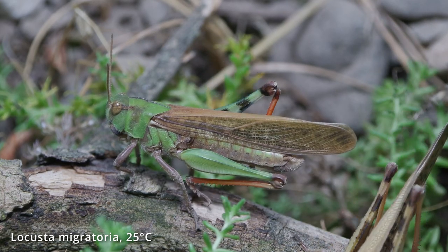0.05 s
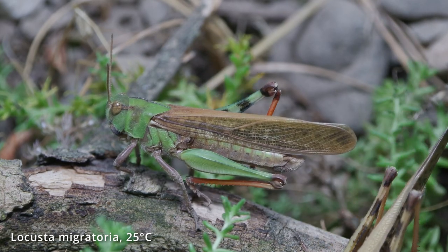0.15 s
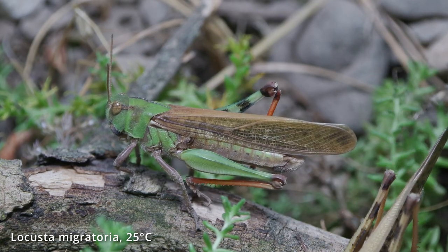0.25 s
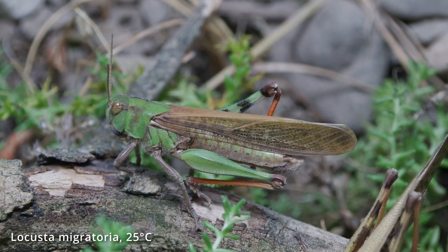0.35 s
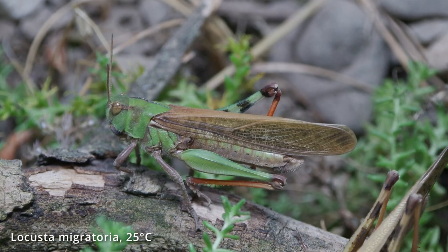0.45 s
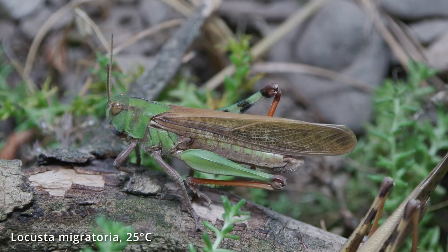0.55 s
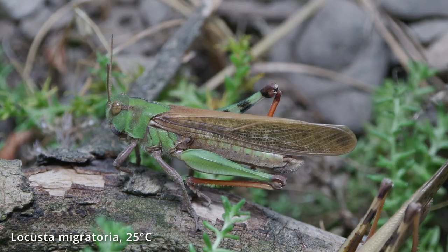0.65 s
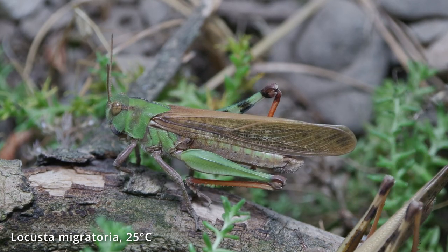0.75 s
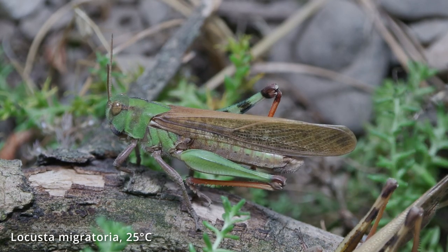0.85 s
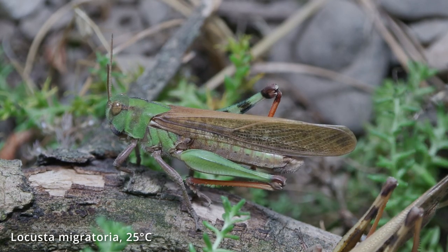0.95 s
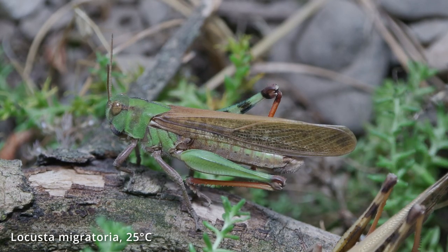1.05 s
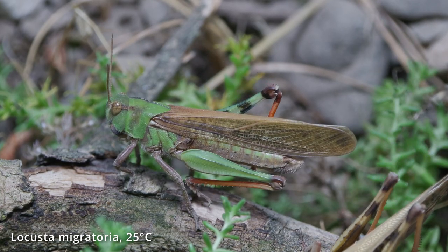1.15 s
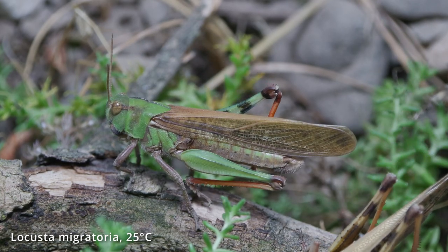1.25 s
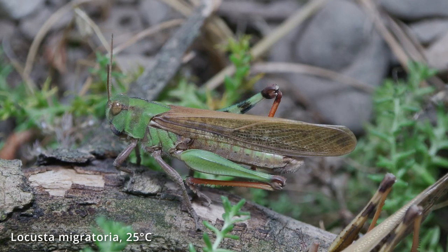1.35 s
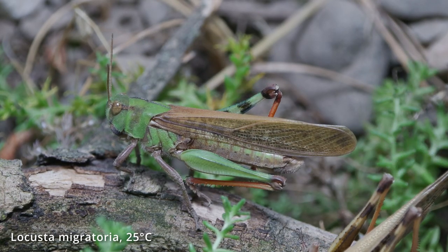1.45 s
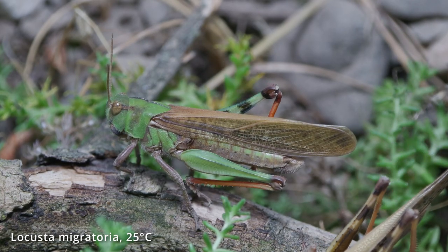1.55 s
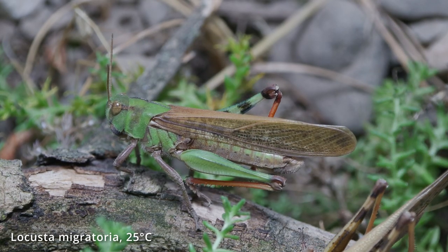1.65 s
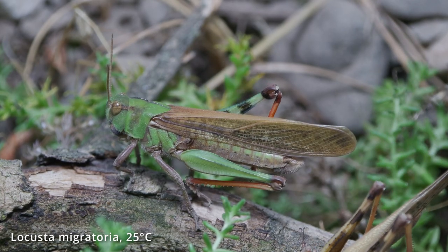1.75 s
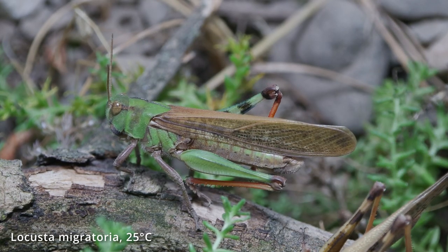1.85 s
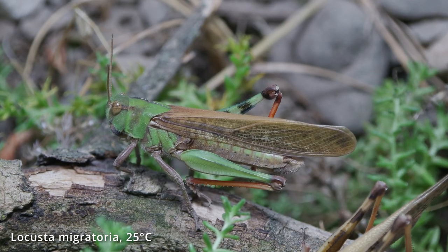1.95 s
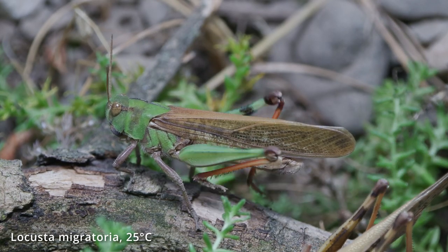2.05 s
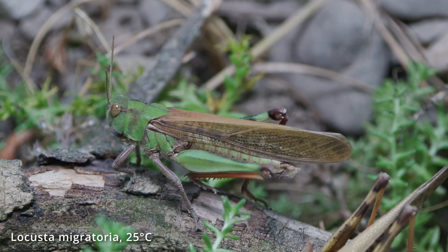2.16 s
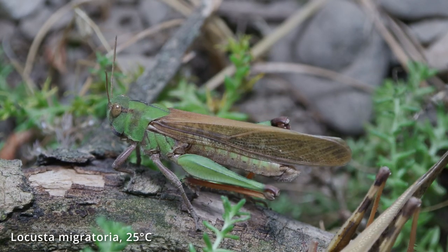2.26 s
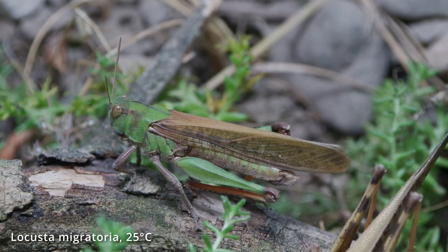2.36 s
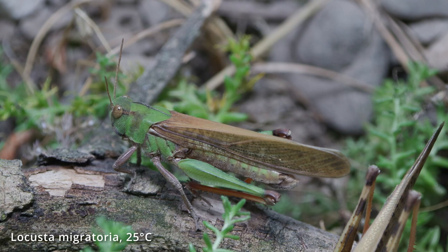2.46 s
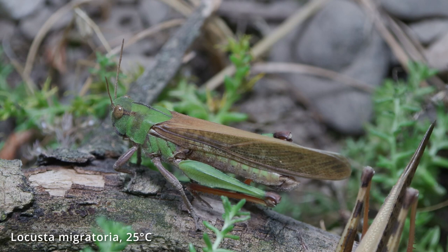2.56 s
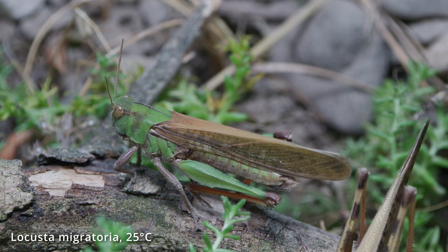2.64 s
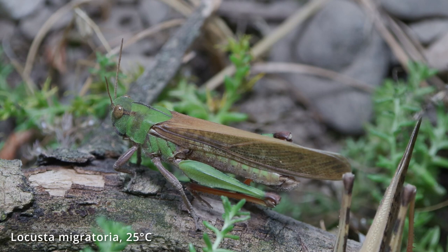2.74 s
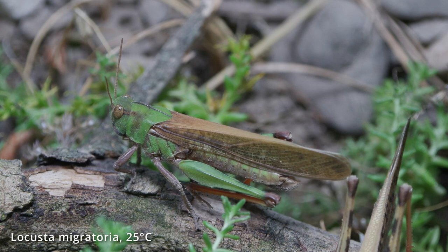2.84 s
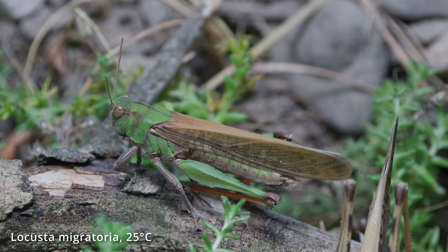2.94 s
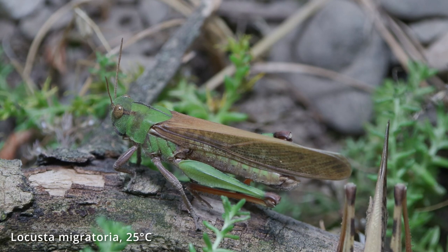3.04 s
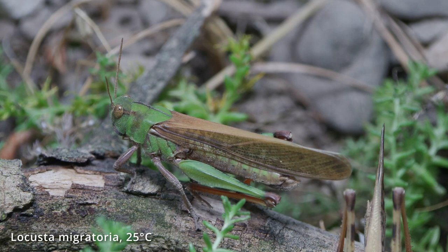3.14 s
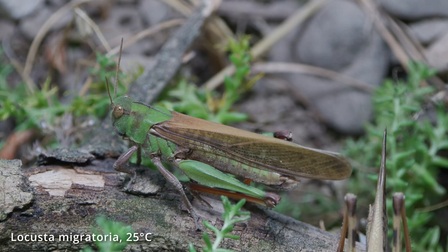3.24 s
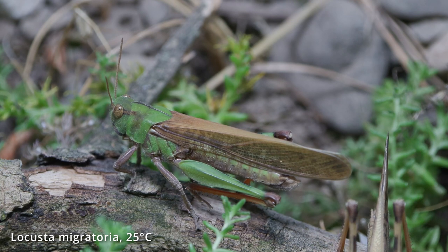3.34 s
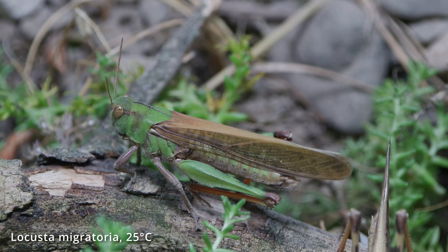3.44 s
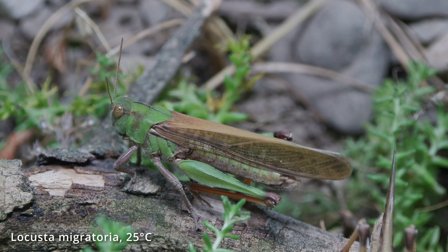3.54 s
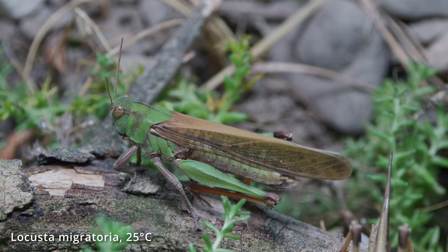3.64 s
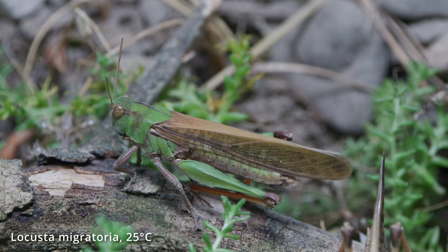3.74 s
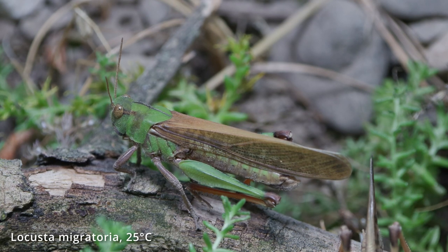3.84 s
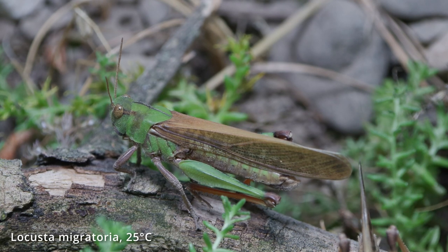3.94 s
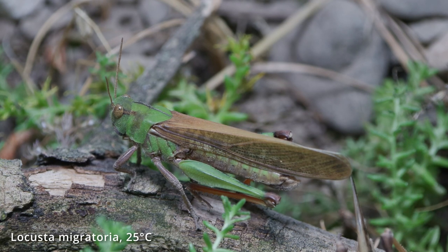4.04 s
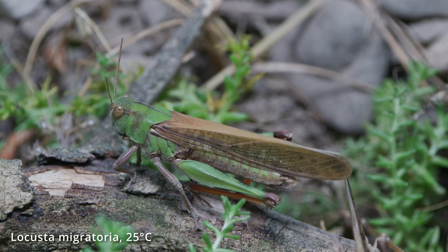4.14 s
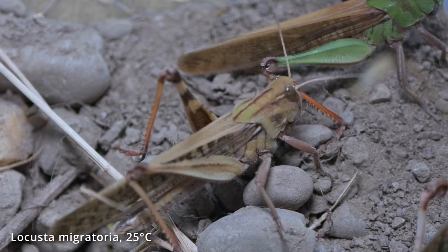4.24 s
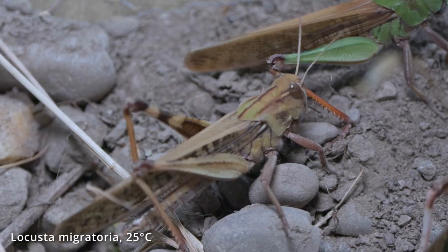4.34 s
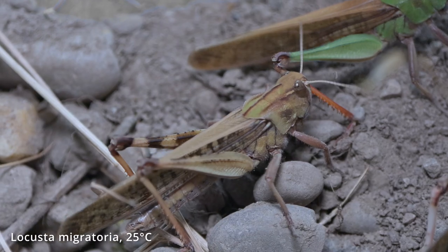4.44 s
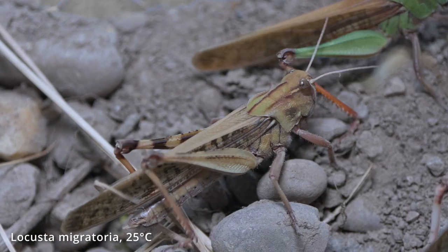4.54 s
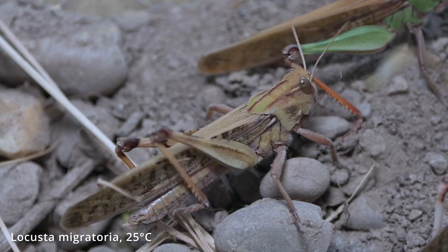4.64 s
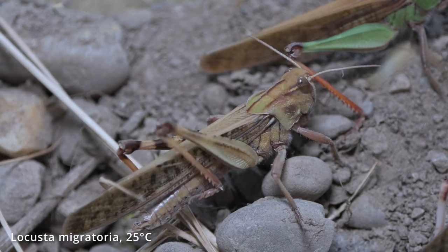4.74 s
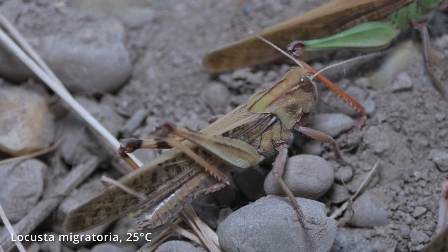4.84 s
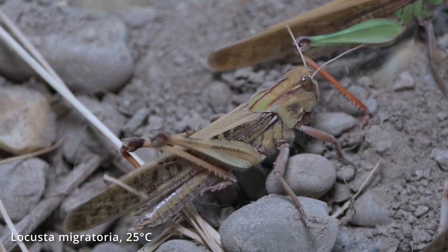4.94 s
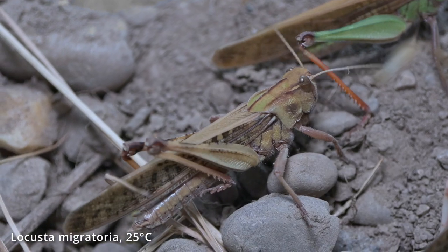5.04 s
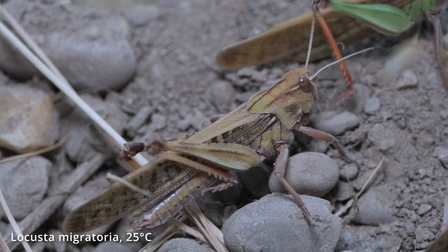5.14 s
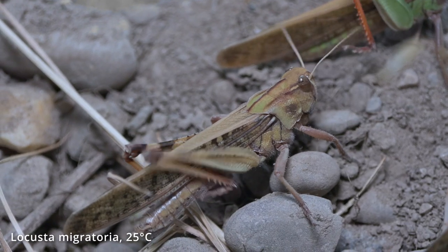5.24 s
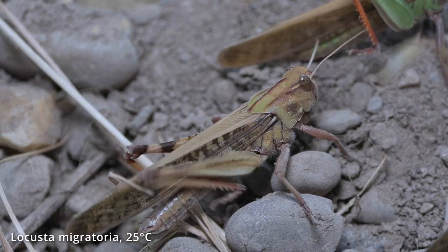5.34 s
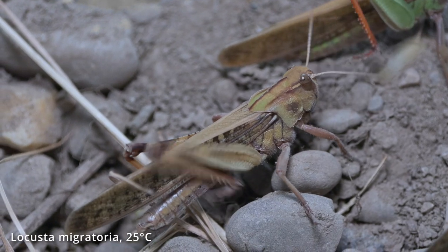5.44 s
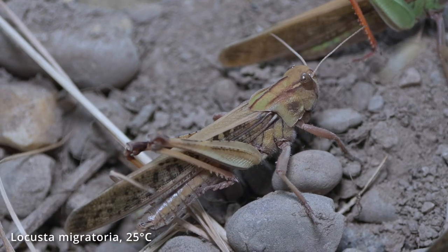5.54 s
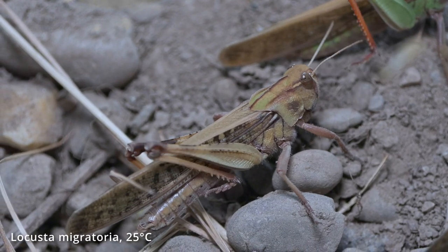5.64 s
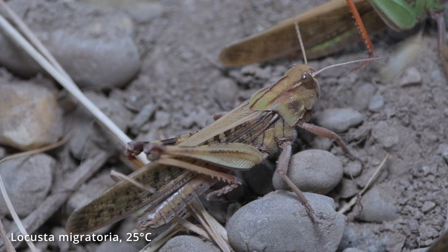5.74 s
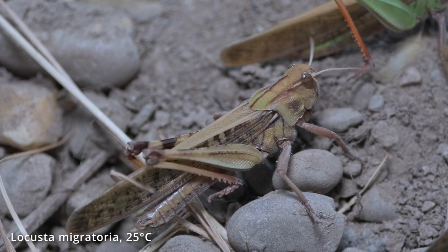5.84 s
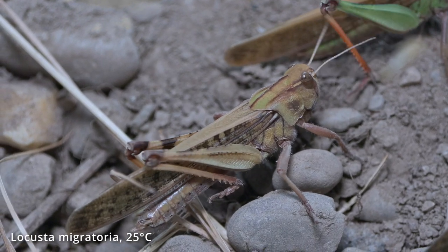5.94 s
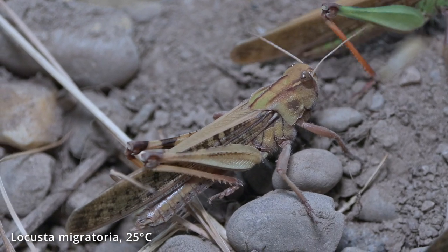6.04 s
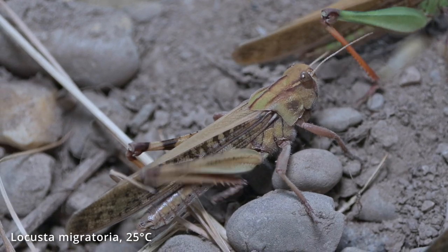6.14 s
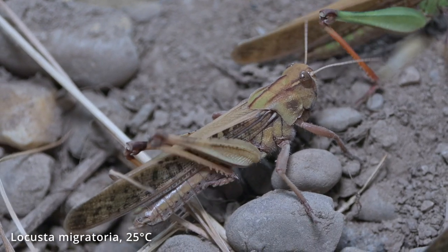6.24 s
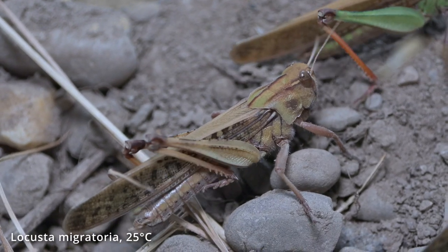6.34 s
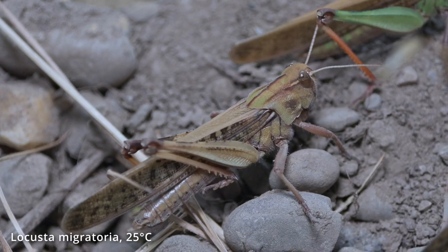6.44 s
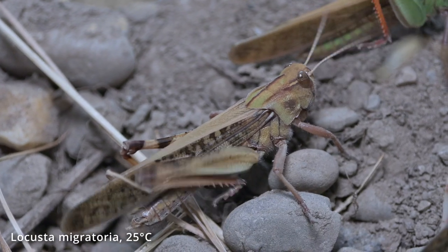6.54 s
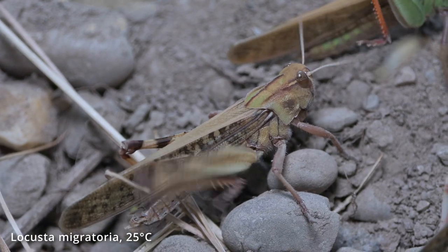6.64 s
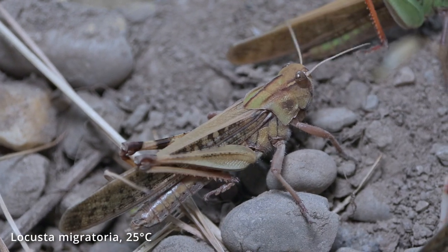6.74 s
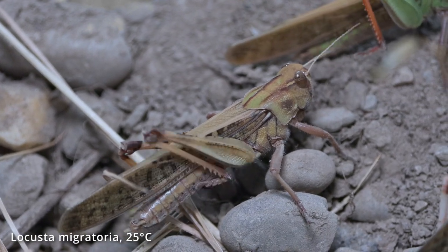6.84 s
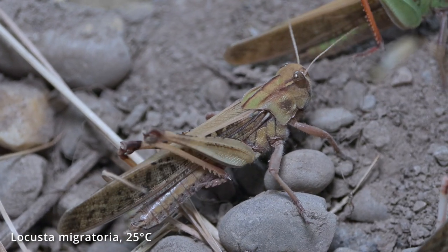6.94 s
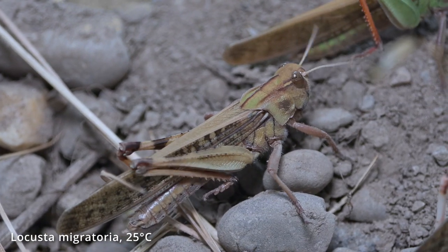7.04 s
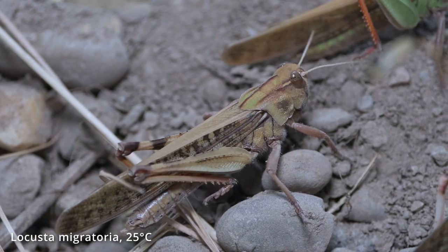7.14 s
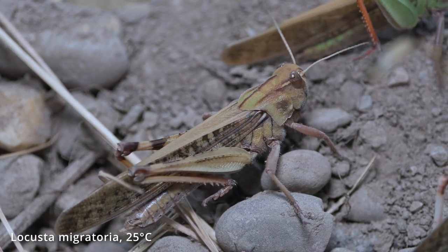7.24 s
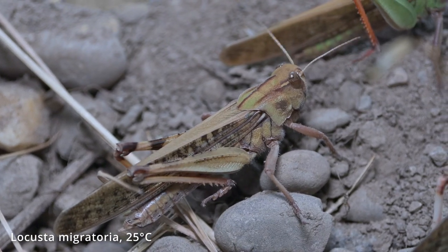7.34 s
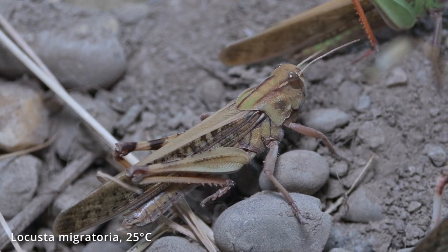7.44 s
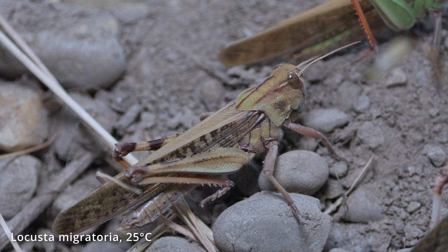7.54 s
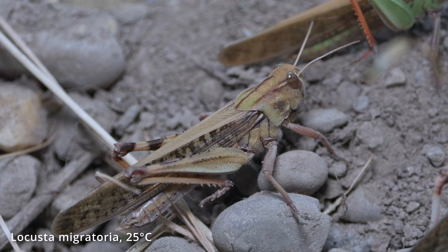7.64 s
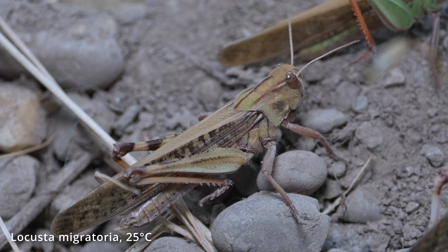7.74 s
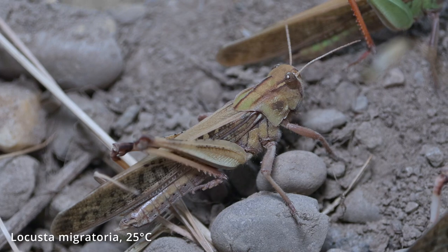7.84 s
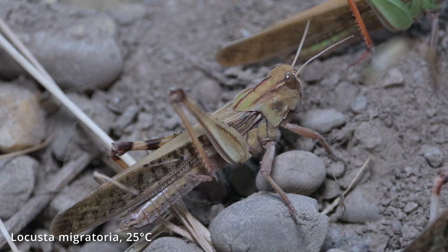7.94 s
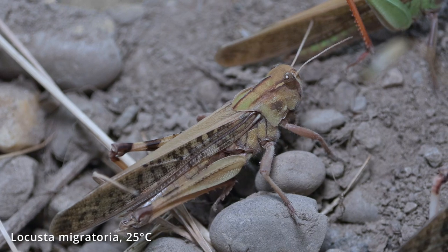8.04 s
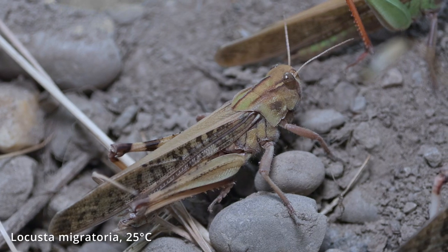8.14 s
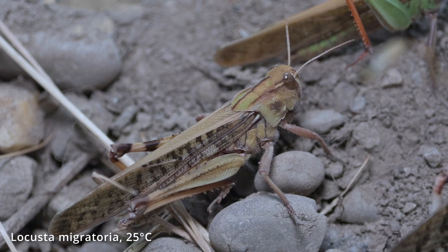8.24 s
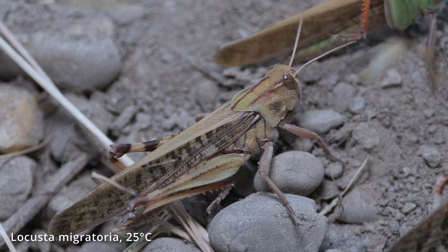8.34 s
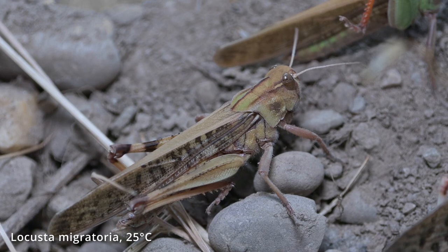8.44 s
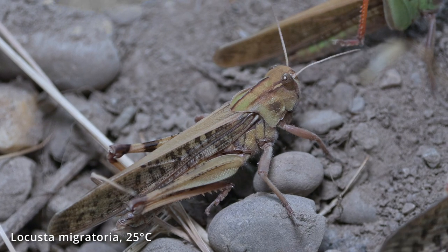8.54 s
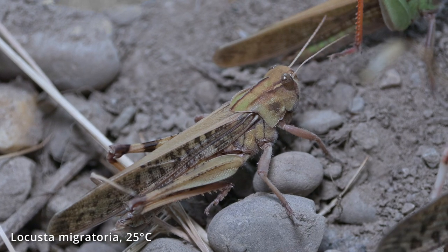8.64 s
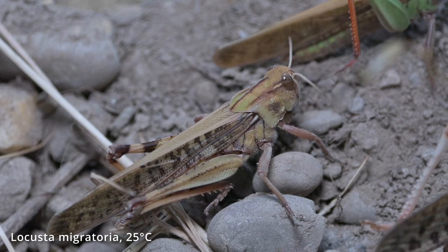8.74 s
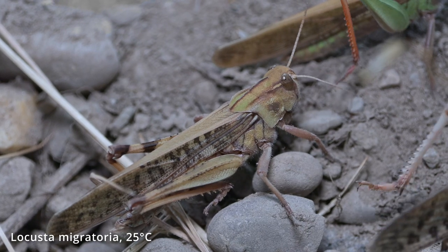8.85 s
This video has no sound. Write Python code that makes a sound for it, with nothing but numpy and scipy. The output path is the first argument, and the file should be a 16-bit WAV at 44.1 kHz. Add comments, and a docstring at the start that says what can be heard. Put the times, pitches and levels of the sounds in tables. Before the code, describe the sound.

A close locust scrapes out two bursts of dry, rapid double rasps on quiet outdoor ground, while distant birds whistle, trill and chatter.

```python
"""Stony ground outdoors: one microphone close to a locust, with distant trees around and a low rumble in the air.
The locust rubs its hind legs on its wings in short double strokes: bands of scraping noise follow each stroke,
swept tones carry the tooth rate. Birds whistle, chatter, warble and trill as gliding sines, echoed by the trees;
bands of noise make far song and hiss. Halfway the listening place moves to a quieter spot."""
import sys
import numpy as np
from scipy import signal
from scipy.fft import rfft, irfft, next_fast_len
from scipy.io import wavfile
from scipy.ndimage import uniform_filter1d, map_coordinates

SR = 44100
rng = np.random.default_rng(int(sys.argv[2]) if len(sys.argv) > 2 else 0)


def store_pcm(level_fs):
    """Save levels as 16-bit WAV."""
    pcm = np.round(np.clip(level_fs, -1, 1) * 32767).astype(np.int16)
    wavfile.write(sys.argv[1], SR, np.atleast_2d(pcm).T)


def gain_from_decibels(decibels):
    """Convert decibel values to linear amplitude factors."""
    exponent = np.asarray(decibels, float) / 20
    return 10 ** exponent


N = 392032


def unit(x):
    """Scaled to rms 1."""
    return x / np.sqrt(np.mean(x ** 2) + 1e-20)


def along(points, hz):
    """Interpolates (Hz, value) points on a log frequency axis."""
    point_hz, values = np.transpose(points)
    return np.interp(np.log(hz + 1), np.log(point_hz + 1), values)


def filtered(x, response):
    """x with its spectrum multiplied by a response of frequency."""
    size = next_fast_len(N + 8192)
    return irfft(rfft(x, size) * response(np.fft.rfftfreq(size, 1 / SR)), size)[..., :N]


def band(lo_hz, hi_hz, order=8):
    """A band-pass gain, with steeper sides at a higher order."""
    return lambda hz: ((1 + (lo_hz / (hz + 1)) ** order) * (1 + (hz / hi_hz) ** order)) ** -.5


def noise(response):
    """Coloured noise of rms 1."""
    return unit(filtered(rng.standard_normal(N), response))


def shaped_noise(points):
    """Noise of rms 1 coloured by (Hz, dB) points."""
    return noise(lambda hz: gain_from_decibels(along(points, hz)))


def wobble(rate):
    """A smooth random curve with rate knots a second."""
    knots = rng.standard_normal(int(N * rate / SR) + 4)
    return map_coordinates(knots, [np.arange(N) * rate / SR])


def add(track, s, piece):
    """Mixes a piece into the track, starting at s seconds."""
    part = track[max(round(s * SR), 0):][:len(piece)]
    part += piece[:len(part)]


def tone(hz, gain):
    """A sine on a pitch path, gain as rms."""
    return np.sqrt(2) * gain * np.sin(2 * np.pi * (np.cumsum(hz) / SR + rng.random()))


def arc(length, start_hz, mid_hz, end_hz):
    """A parabolic pitch path and a soft-edged window."""
    u = np.linspace(0, 1, round(length * SR))
    path = start_hz * (1 - u) * (1 - 2 * u) + 4 * mid_hz * u * (1 - u) + end_hz * u * (2 * u - 1)
    return path, np.sin(np.pi * u) ** 0.28


# Echo decay among the trees. Each row: frequency in Hz, time to fade by 60 dB in seconds.
TREE_DECAY = [(1500, 0.4), (3000, 0.6), (6000, 0.36), (12000, 0.086)]


def trees(x):
    """Echoes from trees and ground: a noise tail in which each frequency dies at its own speed."""
    hz, t, z = signal.stft(rng.standard_normal(SR), SR, nperseg=256)
    decay = gain_from_decibels(-60 * t / along(TREE_DECAY, hz)[:, None])
    build_up = 1 - np.exp(-t / 0.023)
    tail = signal.istft(z * decay * build_up, SR, nperseg=256)[1]
    delayed = np.pad(x, (700, 0))  # samples before the first echo
    return signal.fftconvolve(delayed, tail / np.linalg.norm(tail))[:N]


def far_calls(count=500):
    """Many faint birds at random moments, pitches and slopes, of rms 1 together."""
    out = np.zeros(N)
    for when, pitch, slope, size in rng.random((count, 4)):
        start_hz = 2500 + 2300 * pitch
        mid_hz, end_hz = start_hz * (1.03 - .17 * slope), start_hz * (1.06 - .32 * slope)
        hz, window = arc(0.018 + 0.042 * size, start_hz, mid_hz, end_hz)
        add(out, when * N / SR, tone(hz, window * gain_from_decibels(-7 * pitch)))  # higher calls are fainter
    return unit(out * (1 + wobble(120)))


def chorus_streaks():
    """Noise of rms 1 in narrow streaks of frequency that come and go, like blurred song."""
    z = signal.stft(rng.standard_normal(N), nperseg=512)[2]
    field = uniform_filter1d(rng.standard_normal(z.shape), size=2, axis=0)  # across frequency
    field = uniform_filter1d(field, size=12, axis=1)  # along time
    streaks = signal.istft(z * gain_from_decibels(4.5 * unit(field)), nperseg=512)[1][:N]
    return unit(filtered(streaks, band(2100, 4700, order=14)))


# The air over time. Each row: moment in seconds, rumble level in dB, reference level of the far chorus in dB.
AIR_LEVELS = [(0, -55.5, -71.5), (.8, -53.5, -77), (1.5, -56.5, -69.5), (2.2, -53.5, -65), (3.1, -55, -72),
              (3.5, -53.5, -77), (4.2, -54, -75), (4.35, -60.5, -77), (5.301, -59, -63.5),
              (6.2, -59.5, -63), (6.6, -61.5, -85.5), (7.6, -58.5, -76.5), (8.3, -55, -79),
              (8.89, -54.5, -76)]
# Colour of the low rumble. Each row: frequency in Hz, relative gain in dB.
RUMBLE_COLOUR = [(12, -40), (20, -11), (43, 2.5), (59, 2.5), (111, -5), (200, -22), (260, -46.5),
                 (440, -120)]
# Hiss of the first, green spot. Each row: frequency in Hz, relative gain in dB.
GREEN_COLOUR = [(90, -16.5), (152, 0), (330, -12.5), (450, -10.5), (580, -13.5), (1100, -18), (1950, -25.5),
                (3300, -23.5), (6500, -39), (15900, -41)]
# Hiss of the second, stony spot. Each row: frequency in Hz, relative gain in dB.
STONY_COLOUR = [(90, -27), (152, 0.5), (320, -11), (2050, -19), (4600, -24.5), (6400, -33.5), (15900, -36)]
GREEN_DB, STONY_DB, MOVE_S = -61.5, -67, 4.27  # hiss levels, and the moment of the move


def background():
    """Low rumble, a chorus of far birds both streaky and echoed, and the hiss of either spot."""
    s, *levels = np.transpose(AIR_LEVELS)
    t = np.arange(N) / SR
    rumble_db, chorus_db = [np.interp(t, s, level) for level in levels]
    rumble = gain_from_decibels(rumble_db) * shaped_noise(RUMBLE_COLOUR)
    calls = far_calls()
    chorus = gain_from_decibels(chorus_db - 4.5) * chorus_streaks() + gain_from_decibels(chorus_db - 1.0) * unit(calls + trees(calls))
    moved = np.clip((t - MOVE_S) / 0.023, 0, 1)
    green_hiss = gain_from_decibels(GREEN_DB) * shaped_noise(GREEN_COLOUR)
    stony_hiss = gain_from_decibels(STONY_DB) * shaped_noise(STONY_COLOUR)
    return rumble + chorus + (1 - moved) * green_hiss + moved * stony_hiss


# A buzzy call, a rustle, three blurred strands of far song and a broad wash (the last but one).
# Each row: start in seconds, length in seconds, low edge in Hz, high edge in Hz, level in dB before the flutter.
HISS_BANDS = [(1.845, 0.41, 6700, 7740, -74.5), (3.23, 0.26, 4500, 9000, -82), (2.05, 1.5, 2750, 3020, -71),
              (2.3, 1.35, 4300, 4800, -75.5), (2.15, 1.69, 3100, 7100, -77), (.3, 1.2, 3150, 3750, -75)]


def hisses():
    """Soft, steep-sided bands of noise that swell, flutter and fade."""
    out = np.zeros(N)
    for s, length, lo_hz, hi_hz, db in HISS_BANDS:
        swell = signal.windows.tukey(round(length * SR), .7)
        level = gain_from_decibels(db + 2.2 * wobble(40)[:len(swell)])
        add(out, s, level * swell * noise(band(lo_hz, hi_hz, order=80))[:len(swell)])
    return out


# A far trill of falling chips. Each row: moment in seconds, middle pitch in Hz, level in dB.
TRILL_PATH = [(1.333, 5740, -79), (1.6, 5820, -75), (1.9, 6040, -74), (2.7, 6010, -74), (3.06, 5920, -76)]


def trill():
    """Each chip falls in pitch during the first part of its cycle and is silent for the rest."""
    s, hz, db = np.transpose(TRILL_PATH)
    t = np.arange(s[0], s[-1], 1 / SR)
    u = (t - s[0]) * 48.5 % 1 / .55  # 48.5 chips a second, each sounding for 55 % of its cycle
    swell = np.sin(np.pi * np.clip(u, 0, 1))
    out = np.zeros(N)
    add(out, s[0], tone(np.interp(t, s, hz) + 1050 * (.5 - u), gain_from_decibels(np.interp(t, s, db)) * swell))
    return out


# Whistled notes among the trees.
# Each row: start in seconds, length in seconds, start pitch in Hz, end pitch in Hz, level in dB before the flutter.
WHISTLED_NOTES = [(0, .07, 3550, 3280, -67), (0, .04, 2760, 2680, -68), (1.19, .2, 4760, 4700, -78.5),
                  (0.071, 0.046, 2850, 2647, -60.5), (0.113, 0.027, 2650, 2270, -63.5),
                  (0.234, 0.045, 5380, 5120, -74), (0.61, 0.065, 3250, 2670, -69),
                  (0.311, 0.084, 4010, 3310, -68), (0.753, 0.07, 4830, 4380, -68),
                  (0.984, 0.052, 3890, 3400, -70), (1.046, 0.075, 2705, 2720, -70.5),
                  (1.29, 0.06, 1976, 2620, -74.5), (1.3, 0.1, 5260, 4900, -74.5),
                  (1.375, 0.07, 3460, 3390, -68), (1.465, 0.2, 4100, 3990, -68.5),
                  (1.52, 0.035, 3900, 2950, -72), (1.55, 0.12, 2920, 2865, -68),
                  (1.665, 0.026, 2610, 2070, -65), (1.719, 0.027, 1900, 1600, -73),
                  (1.748, 0.025, 1956, 1690, -66.5), (1.744, 0.035, 4250, 3540, -69),
                  (1.737, 0.073, 2970, 2920, -74), (1.851, 0.055, 3880, 3880, -72),
                  (1.889, 0.056, 3850, 2230, -67.5), (1.97, 0.045, 2950, 2580, -65),
                  (2.011, 0.039, 2600, 1725, -63), (2.1, 0.068, 2780, 2450, -67),
                  (3.86, 0.15, 3350, 3440, -78), (4.03, 0.13, 2580, 2540, -78),
                  (3.44, 0.18, 2580, 2540, -74), (3.51, 0.088, 3200, 3250, -71),
                  (3.745, 0.28, 4440, 4490, -81), (4.243, 0.02, 2260, 1870, -65),
                  (4.261, 0.022, 2680, 2700, -64.5), (4.343, 0.052, 3990, 3790, -67),
                  (4.393, 0.026, 3780, 4830, -67), (4.706, 0.029, 5400, 4250, -48),
                  (6.157, 0.028, 7300, 7850, -69.5), (6.183, 0.02, 7850, 6800, -68),
                  (7.198, 0.062, 1945, 1860, -74.5), (7.56, 0.11, 2860, 3120, -74),
                  (7.96, 0.12, 2600, 2850, -76), (8.417, 0.055, 2750, 3150, -71.5),
                  (8.464, 0.06, 3166, 3280, -65.5), (8.469, 0.034, 1890, 2180, -72),
                  (8.505, 0.026, 2125, 2700, -61), (8.62, 0.025, 5500, 4900, -58),
                  (8.675, 0.029, 5500, 4800, -57), (8.779, 0.086, 4010, 3760, -55.5)]
# Two far birds that each repeat one chip. Each row: first start in seconds, interval in seconds, number of chips.
CHIP_RUNS = [(2.193, .1757, 6), (.1, .072, 10)]
# The falling chip of either bird.
# Each row: length in seconds, start, middle and end pitch in Hz, level in dB before the flutter.
CHIP_SHAPES = [(.024, 3164, 2334, 1560, -67), (.022, 4950, 4700, 4550, -77)]
LOW_SHARE = .36  # where a note's middle lies between its lowest and highest pitch: glides linger low
# fainter, farther notes flutter more: level without flutter, drop to the nominal flutter (at most 1.5 times it)
CLEAR_DB, BLUR_DB = -49.5, 13.5


def whistles():
    """Single sine glides and falling chips, slightly unsteady in strength."""
    out = np.zeros(N)
    flutter = .5 * wobble(130)
    for s, length, start_hz, end_hz, db in WHISTLED_NOTES:
        mid_hz = min(start_hz, end_hz) + LOW_SHARE * abs(end_hz - start_hz)
        hz, window = arc(length, start_hz, mid_hz, end_hz)
        blur = np.clip((CLEAR_DB - db) / BLUR_DB, 0, 1.5) * flutter[round(s * SR):][:len(hz)]
        add(out, s, tone(hz * (1 + .011 * blur), gain_from_decibels(db + 4.9 * blur) * window))
    for (first_s, every_s, times), (*glide, db) in zip(CHIP_RUNS, CHIP_SHAPES):
        hz, window = arc(*glide)
        for k in range(times):
            s = first_s + k * every_s
            add(out, s, tone(hz, gain_from_decibels(db) * window * (1 + flutter[round(s * SR):][:len(hz)])))
    return out * gain_from_decibels(1.1 * wobble(30))


# Two pairs of two-voiced chirps.
# Each row: delay in seconds, length in seconds, edge pitch in Hz, top pitch in Hz,
# lower and upper voice in dB relative to the call.
LONG_PAIR = [(0, 0.05, 3300, 3880, -12, -7), (.068, 0.058, 3050, 3613, 0, -1.5)]
SHORT_PAIR = [(0, 0.02, 3300, 4042, -4, -1.5), (.023, .034, 3000, 4180, -1, 1)]
# Repeats of either pair.
# Each row: start in seconds, level in dB, pitch factor of the second chirp, change of its upper voice in dB.
LONG_CALLS = [(7.28, -60.5, 1.11, -9), (7.702, -61.5, 1.04, -3), (8.116, -58.5, .995, 0),
              (8.682, -60, 1.01, 1)]
SHORT_CALLS = [(7.52, -65, 1, 0.0028), (7.89, -65, 1.02, 0.00081), (8.298, -63, 1.01, 0),
               (8.865, -63.5, 1.1, 0.0048)]
# Faint mixing tones. Each row: multiple of the lower voice's pitch, level in dB over the mean of both voices.
MIXING_TONES = [(.63, -18), (1.62, -22), (1.9, -30)]


def chatter():
    """Two hoarse voices arch together with faint mixing tones; the shortest chirps only fall, leading into the next."""
    out = np.zeros(N)
    for pair, calls in ((LONG_PAIR, LONG_CALLS), (SHORT_PAIR, SHORT_CALLS)):
        for second, (delay, length, edge_hz, top_hz, low_db, high_db) in enumerate(pair):
            falls = length < .03
            hz, window = arc(length, top_hz if falls else edge_hz, top_hz, edge_hz)
            window = window * (hz / top_hz) ** 3.5  # the beak is widest at the top
            for s, db, factor, upper_change_db in calls:
                up_db = high_db + second * upper_change_db
                voices = [(1, low_db), (1.26, up_db)]
                voices += [(ratio, (low_db + up_db) / 2 + mix_db) for ratio, mix_db in MIXING_TONES]
                for ratio, voice_db in voices:
                    add(out, s + delay, tone(factor ** second * ratio * hz, gain_from_decibels(db + voice_db) * window))
    return out * (1 + .7 * wobble(350))  # hoarseness


# One warbled figure: a tick, a falling hook and a low turn.
# Each row: moment in seconds, pitch in Hz before stretching, level in dB relative to the repeat.
WARBLE_TICK = [(-.005, 4700, -24), (-.001, 5420, -11), (.002, 6100, -29)]
WARBLE_HOOK = [(0, 3854, -24), (.007, 4673, -3.5), (.013, 4230, -10.5), (0.02, 3200, 3.5),
               (.031, 2470, -6.5)]
WARBLE_TURN = [(.037, 1907, -13.5), (.045, 1844, -9.5), (0.06, 2348, -8.5), (.068, 1900, -12.5),
               (.078, 1391, -14)]
# One number for each repeat of the figure: factor that stretches its pitch range about 3200 Hz, without unit.
WARBLE_STRETCH = [1.03, 1.03, 1.2, .98, .975, 1.06, .995]
WARBLE_S, WARBLE_EVERY_S = 5.178, .1393
WARBLE_DB, WARBLE_GROWS_DB = -45, 0.2  # first repeat, growth with each further one


def warble():
    """The same figure, repeated at a steady pace and growing louder."""
    out = np.zeros(N)
    for k, factor in enumerate(WARBLE_STRETCH):
        s, db = WARBLE_S + k * WARBLE_EVERY_S, WARBLE_DB + k * WARBLE_GROWS_DB
        for moments, hz, level in map(np.transpose, (WARBLE_TICK, WARBLE_HOOK, WARBLE_TURN)):
            t = np.arange(moments[0], moments[-1], 1 / SR)
            path = uniform_filter1d(np.interp(t, moments, hz), size=70, mode="nearest")
            stretched = path * factor ** np.minimum((path - 3200) / 1500, 1)
            gain = gain_from_decibels(db + np.interp(t, moments, level)) * signal.windows.tukey(len(t), .2)
            add(out, s + moments[0], tone(stretched, gain))
    return out


STROKE_T = np.arange(SR // 8) / SR - .003  # time axis of one stroke, in seconds


def fade(start, t60):
    """Full level until start, then a fall of 60 dB per t60 seconds."""
    return gain_from_decibels(-60 * np.clip(STROKE_T - start, 0, 1) / t60)


# Fast leg strokes.
# Each row: moment in seconds, stroke strength in dB, wing body over stroke in dB, length in seconds,
# upper over lower wing resonance in dB.
DOWN_STROKES = [(4.657, -23, -0.5, 0.0061, 2), (4.744, -16, 0, 0.006, 6.5),
                (4.829, -15.5, 0.5, 0.0081, 5.5), (4.929, -14, 3.5, 0.006, 8),
                (5.047, -15, -2, 0.0056, 3.5), (5.157, -18, 1, 0.0044, 0.5),
                (5.27, -17, -0.5, 0.0044, -2.5), (5.3797, -15.5, -0.5, 0.0043, 2),
                (5.5037, -16.5, 1.5, 0.0042, 9), (5.6319, -14, 1, 0.0037, 4),
                (6.1812, -50.5, 9.5, 0.0039, 4), (6.2655, -21.5, -3.5, 0.0018, -3),
                (6.3496, -16, 0.5, 0.0059, -0.5), (6.4484, -16, -2, 0.0042, -0.5),
                (6.5976, -19.5, -6, 0.0035, 3), (6.699, -14.5, -1.5, 0.0049, 6.5),
                (6.845, -56.5, 3.5, 0.004, 3), (6.9452, -14.5, -2, 0.0059, 2.5)]
# Relative levels in dB of the tooth rate and its overtone.
TEETH_LEVELS = [-4, -13.5]
TOP_HZ = 16500  # tooth tones above this stay silent
THUMP_DB, THUMP_GROWS = -12, 2.36  # the low thump follows the ring of the wing body, dB per dB
FIRM_DB, DULLS = -17.5, 1.2  # body rings weaker than this lose treble, dB per dB


def down_strokes(tracks):
    """Pressure builds, the leg speeds up and stops dead; body and wing ring out while the tooth rate sweeps up."""
    edge, body, thump, squeak, _, dull_db = tracks
    t = STROKE_T
    for s, db, body_db, length, _ in DOWN_STROKES:
        rise = np.clip((t + 0.0031) / (.0021 + .55 * length), 0, 1) ** 2.2
        add(edge, s - .003, gain_from_decibels(db - 6.0) * rise * (fade(length, 0.008) + 0.14 * fade(length, 0.081)))
        add(body, s - .0025, gain_from_decibels(db + body_db - 2.5) * rise * (fade(length, 0.014) + 0.059 * fade(length, .06)))
        add(thump, s - .001, gain_from_decibels(db + THUMP_DB + THUMP_GROWS * body_db) * rise * fade(length, 0.025))
        # quiet noise ramp ahead of the stroke
        add(edge, s - .016, gain_from_decibels(db - 38) * np.linspace(0, 1, round(0.018 * SR)) ** 2.2)
        treble_loss_db = DULLS * np.clip(db + body_db - FIRM_DB, -9, 0)
        add(dull_db, s - .016, np.full(round(0.033 * SR), treble_loss_db))
        final_hz = 14000 * gain_from_decibels(0.6 * np.clip(db + 17.0, -12, 0))  # a harder stroke ends faster
        rate_hz = 4300 + (final_hz - 4300) * np.clip(t / length, 0, 1) ** 1.3
        for k, share_db in enumerate(TEETH_LEVELS, start=1):
            heard = k * rate_hz < TOP_HZ
            gain = gain_from_decibels(db + share_db) * heard * rise ** 2 * fade(length, 0.0043)
            add(squeak, s - .003, tone(k * rate_hz, gain))


# Return strokes, one after each fast stroke.
# Each row: moment in seconds, stroke strength in dB, wing body over stroke in dB,
# upper over lower wing resonance in dB.
RETURN_STROKES = [(4.6805, -20.5, -7.5, -0.5), (4.768, -17.5, -1, 1), (4.8552, -18.5, -1, 1),
                  (4.9628, -18.5, -2, 5), (5.082, -24.5, 0, 1.5), (5.1948, -22.5, 0.5, 7),
                  (5.302, -22, -2.5, 2), (5.4136, -20.5, -2, 3.5), (5.536, -19.5, -3, 5.5),
                  (5.666, -27, 2.5, 7), (6.2169, -37.5, -3.5, 4), (6.2941, -21, -2, 0.5),
                  (6.3824, -21, -2.5, 0), (6.4814, -25.5, -2.5, 0), (6.6216, -22, 0.5, 4.5),
                  (6.727, -44.5, 10.5, 6), (6.8749, -21, 0, 2.5), (6.971, -21, -1, 2.5)]
# the longer the leg drags before it turns, the shorter the return
RETURN_S, RETURN_SHRINKS = 0.023, 0.45  # length in s without drag (a fall of about 11 dB), loss per s of drag


def return_strokes(tracks):
    """The return catches sharply, slows down and lifts off, its tooth rate falling."""
    edge, body, thump, squeak, soft, _ = tracks
    t = STROKE_T
    for (s, db, body_db, _), down in zip(RETURN_STROKES, DOWN_STROKES):
        length = RETURN_S - RETURN_SHRINKS * (s - down[0])
        catch = np.clip((t + .002) / 0.0029, 0, 1) ** 2.0
        pull = catch * fade(0, 5.56 * length) * (fade(1.2 * length, 0.023) + .04)
        add(edge, s - .003, gain_from_decibels(db - 2.0) * pull)
        add(body, s - .003, gain_from_decibels(db + body_db - 0.5) * pull)
        add(thump, s - .003, gain_from_decibels(db - 8.5) * pull)
        add(soft, s - .003, gain_from_decibels(db - 27.5) * (t > length) * fade(length, 0.081))
        rate_hz = 4000 + 4000 * fade(0, 4 * length)
        add(squeak, s - .003, tone(rate_hz, gain_from_decibels(db - 2.85) * pull * (t > 0) * fade(.45 * length, 0.03)))


# the longer the leg drags, the harder it presses: base level, growth, share of the return's strength
DRAG_DB, DRAG_DB_PER_S, DRAG_FOLLOWS = -39, 449, 0.49
DRAG_SWELL_DB, DRAG_AFTER = 5, .4  # swell up to the turn; it starts softer after a weak stroke, dB per dB


def drags(tracks):
    """Between the two strokes the leg drags lightly along the wing, pressing harder as it turns."""
    edge, body, thump, *_ = tracks
    lumps = gain_from_decibels(1.9 * wobble(180))  # the dragging leg sticks and slips
    for (up_s, up_db, *_), (s, down_db, *_) in zip(RETURN_STROKES, DOWN_STROKES):
        drag_s = up_s - s
        turn_db = DRAG_DB + DRAG_DB_PER_S * drag_s + DRAG_FOLLOWS * up_db
        size = round(drag_s * SR)
        missing = 1 - np.linspace(0, 1, size) ** 2.3
        press = gain_from_decibels(turn_db - (DRAG_SWELL_DB - DRAG_AFTER * down_db) * missing)
        drag = press * lumps[round(up_s * SR):][:size]
        add(edge, s, gain_from_decibels(-6.0) * drag)
        add(body, s, drag)
        add(thump, s, gain_from_decibels(-10.0) * drag)


# Light brushes of leg on wing.
# Each row: start in seconds, length in seconds, level in dB, wing body over brush in dB.
LEG_BRUSHES = [(6.628, 0.047, -58, -22.5), (7.033, 0.06, -44.5, -16.5)]


def brushes(tracks):
    """The leg touches the wing lightly: a soft swell of hiss with a little body."""
    _, body, _, _, soft, _ = tracks
    for s, length, db, body_db in LEG_BRUSHES:
        swell = np.hanning(round(length * SR))
        add(soft, s, gain_from_decibels(db) * swell)
        add(body, s, gain_from_decibels(db + body_db) * swell)


# Colour of the locust's sound at the microphone. Each row: frequency in Hz, relative gain in dB.
LOCUST_COLOUR = [(90, -30.5), (160, -8.5), (370, 0), (520, -7), (1500, 0.5), (2500, 4), (4150, -13),
                 (5200, -1.5), (6600, -6.5), (8400, -14.5), (10000, -12), (10900, -18), (12600, -7),
                 (14500, -11.5), (16200, -31)]


def scrape_band(lo_hz, hi_hz):
    """One band of scraping noise in the locust's colour, of rms 1."""
    return noise(lambda hz: gain_from_decibels(along(LOCUST_COLOUR, hz)) * band(lo_hz, hi_hz)(hz))


def wing_ring():
    """The contact point moves, favouring now the lower, now the upper wing resonance."""
    strokes = sorted((row[0] - .008, row[-1]) for row in DOWN_STROKES + RETURN_STROKES)
    starts, upper_db = np.transpose(strokes)
    current = np.maximum(np.searchsorted(starts, np.arange(N) / SR) - 1, 0)
    angle = np.arctan(gain_from_decibels(upper_db[current] + 1.8 * wobble(60)))
    lower, upper = np.cos(angle) * scrape_band(1500, 1600), np.sin(angle) * scrape_band(2300, 4200)
    return unit(lower + upper + gain_from_decibels(-8.0) * scrape_band(650, 1100))


def grain(depth_db):
    """Slips make the scrape uneven."""
    return unit(gain_from_decibels(depth_db * wobble(700)))


def locust():
    """Leg teeth rattle over a wing vein: a swept squeak at their rate amid scraping; wing and body resonate."""
    tracks = np.zeros((6, N))  # envelopes, the squeak itself and the treble loss in dB
    for movement in (down_strokes, return_strokes, drags, brushes):
        movement(tracks)
    edge, body, thump, squeak, soft, dull_db = tracks
    knocks = unit(gain_from_decibels(2.2 * np.abs(wobble(1100))))  # single teeth catch hard, heard in edge and body at once
    rasp = gain_from_decibels(-1.5) * scrape_band(5200, 8600) + gain_from_decibels(dull_db - 6) * scrape_band(8000, 17000)
    scrape = edge * knocks * grain(1.2) * rasp
    scrape += body * knocks * grain(1.9) * wing_ring()
    scrape += thump * scrape_band(115, 650)
    brush_hiss = noise(lambda hz: band(4700, 7200, order=26)(hz) + .05 * band(10000, 15500)(hz))
    brushed = soft * grain(2.5) * brush_hiss
    # the same colour shapes the squeak at about half strength
    teeth = filtered(squeak * grain(2.8), lambda hz: gain_from_decibels(0.49 * along(LOCUST_COLOUR, hz) + 3.5))
    # low-pass: treble falls by 10 dB above 15.7 kHz
    return filtered(scrape + brushed + teeth, lambda hz: gain_from_decibels(-10 * np.clip((hz - 15700) / 400, 0, 1)))


def scene():
    """The insect is near and dry, the birds far and wet."""
    air, far_bands = background(), hisses()
    far, chirps, near_bird = whistles() + trill(), chatter(), warble()
    insect = locust()
    sent = gain_from_decibels(-7.0) * far + gain_from_decibels(-13.0) * near_bird + gain_from_decibels(-21.0) * chirps + gain_from_decibels(-43.5) * insect
    return (air + far_bands + far + chirps + near_bird + insect + trees(sent))[None]


def low_pass(x):
    """Removes everything above the highest recorded frequency."""
    return signal.sosfilt(signal.butter(12, 16640, fs=SR, output="sos"), x)


def record(dry):
    """The finished mix as the recorder keeps it."""
    return low_pass(dry)


dry = scene()
out = record(dry)
store_pcm(out)
```